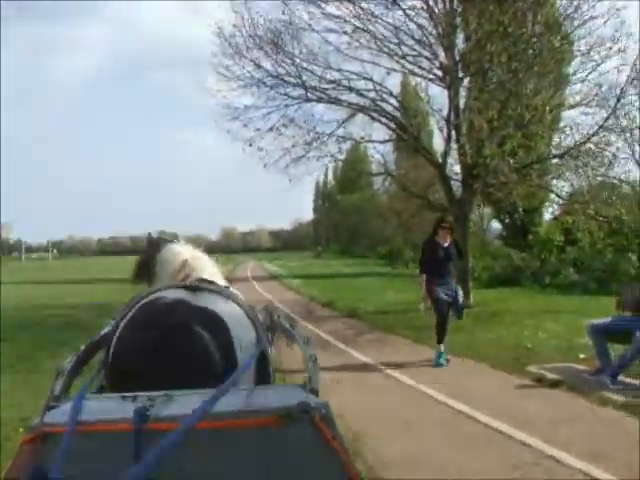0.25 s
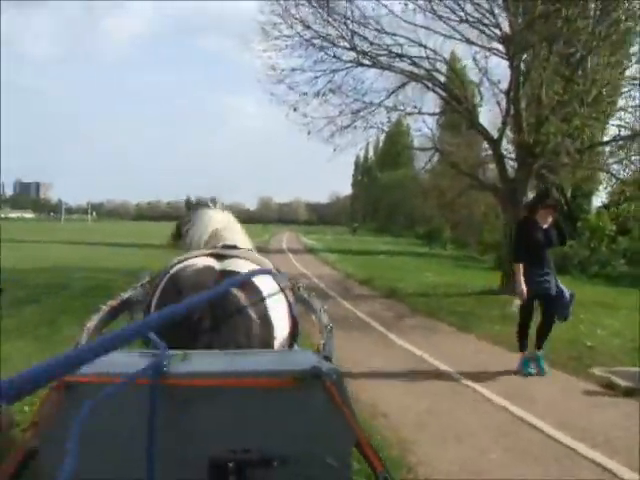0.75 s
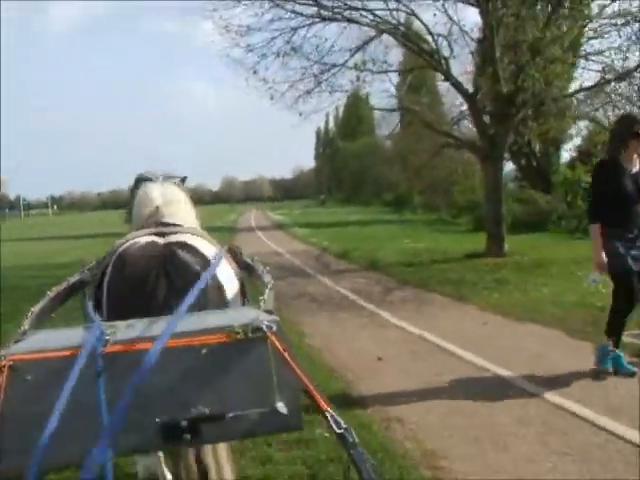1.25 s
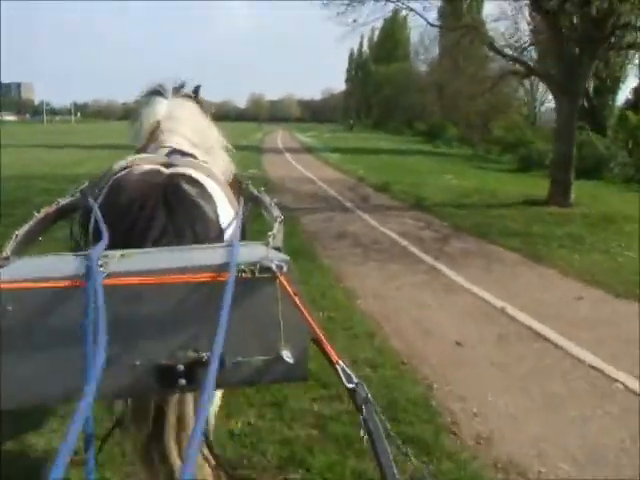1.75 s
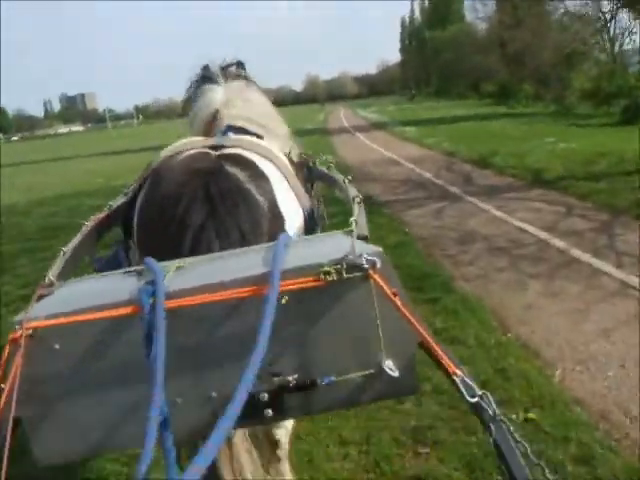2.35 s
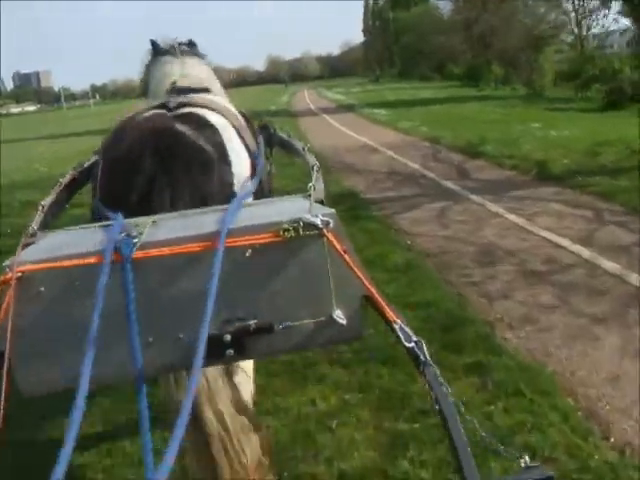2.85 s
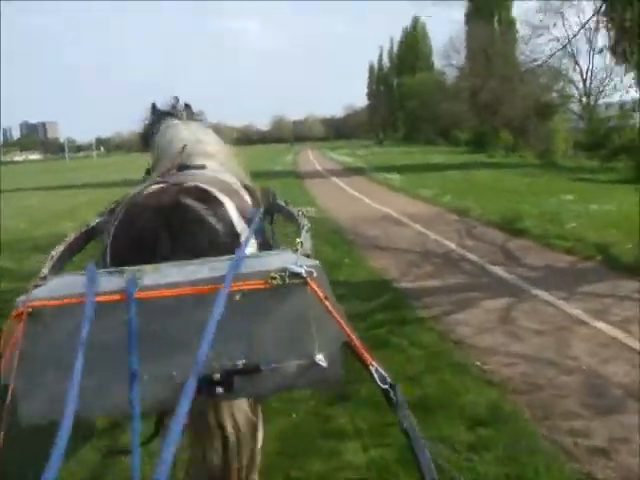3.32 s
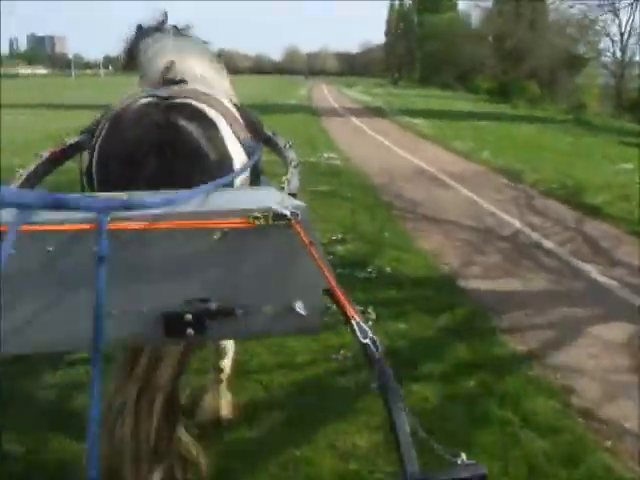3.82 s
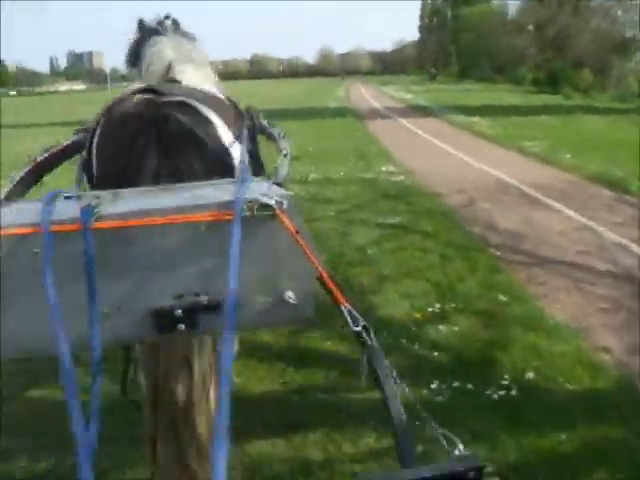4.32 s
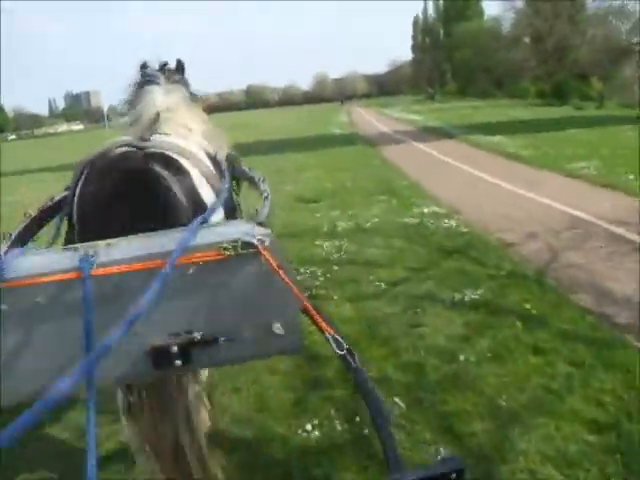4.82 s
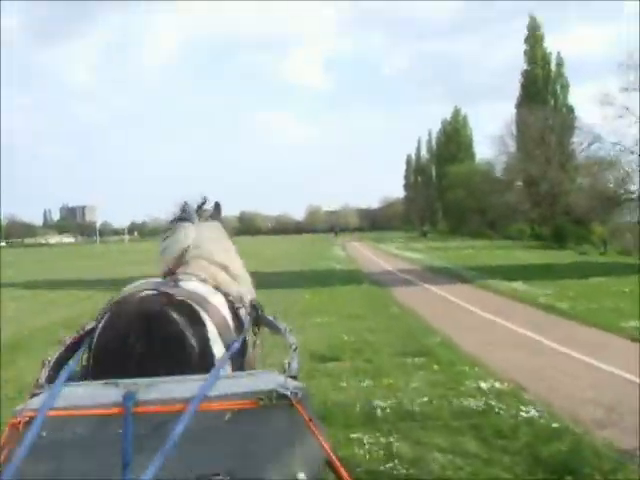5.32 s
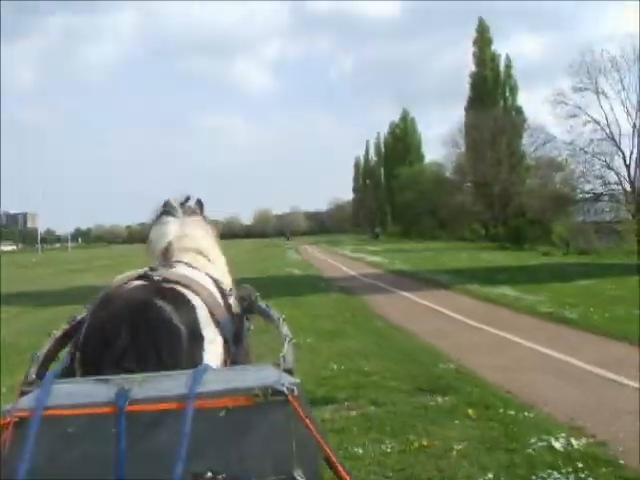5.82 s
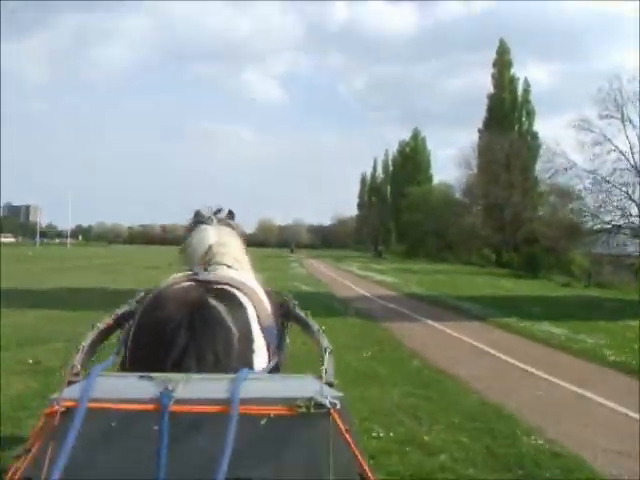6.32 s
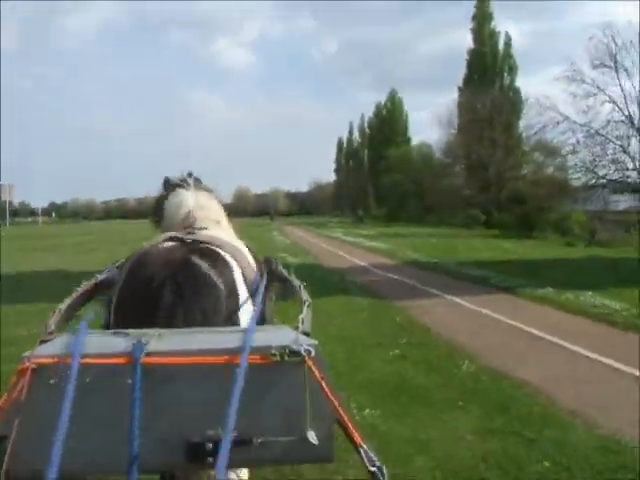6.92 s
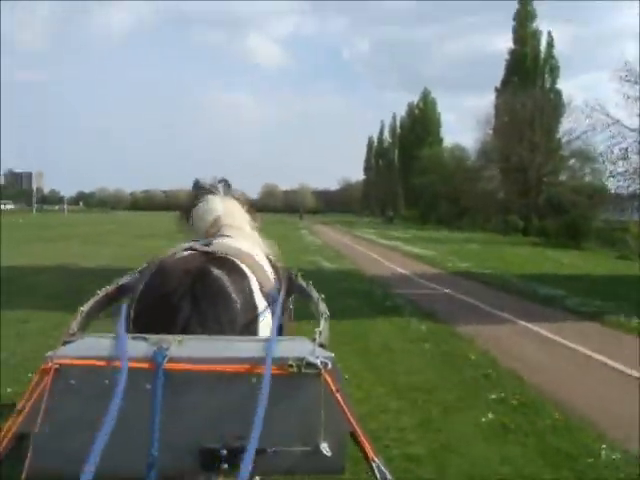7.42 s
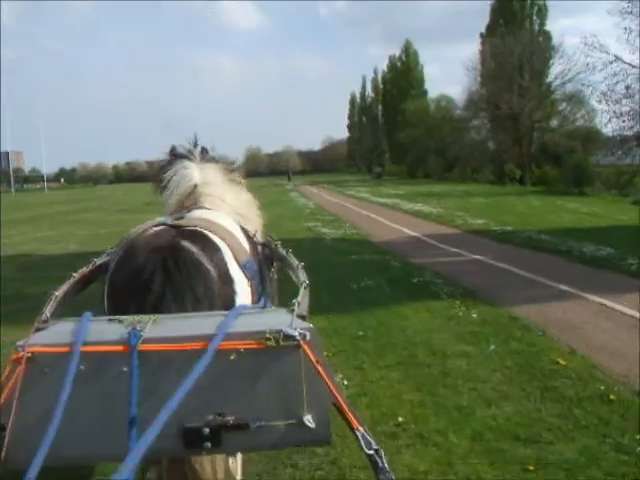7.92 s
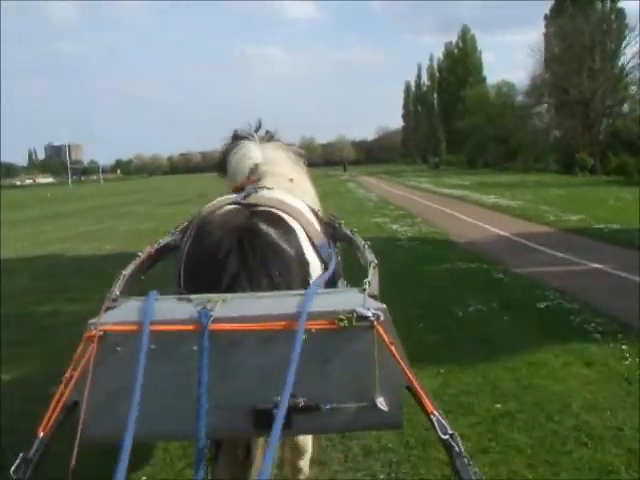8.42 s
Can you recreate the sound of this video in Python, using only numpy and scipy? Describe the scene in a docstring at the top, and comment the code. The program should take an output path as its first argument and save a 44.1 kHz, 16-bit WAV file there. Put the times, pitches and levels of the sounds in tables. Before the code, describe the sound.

A light pony cart rattles and clatters over grass, with hollow thumps, rumbling wheels and four short lip squeaks from the driver.

```python
"""Loose metal fittings clatter at every jolt of a light pony cart on grass, heard from the driver's seat.
Impacts excite the modes of the fittings, the frame and a loose bar; the hollow footboard box resonates,
droning and thumping. The reins swish once, and four times the driver urges the pony on with a squeak of
pursed lips, a fast train of pulses. Wheels and wind rumble as low bands of noise over a faint far hum."""
import sys
import numpy as np
from scipy import signal
from scipy.io import wavfile
from scipy.ndimage import uniform_filter1d

SR = 44100
rng = np.random.default_rng(int(sys.argv[2]) if len(sys.argv) > 2 else 0)


def file_out(sig):
    """Save sig as 16-bit WAV at sys.argv[1]."""
    # one column per channel
    cols = np.atleast_2d(sig).T
    # limit, then scale
    lim = np.clip(cols, -1, 1)
    pcm = np.round(lim * 32767).astype(np.int16)
    wavfile.write(sys.argv[1], SR, pcm)


N = 381906

# Jolts of the cart: (time [s], level [dB], brightest pitch [Hz], relative knock [dB], relative snap [dB])
JOLT_EVENTS = [(0.153, -24.5, 7450, -3, 5), (0.632, -17, 3740, -12, -2), (0.648, -28, 7300, -14, 12),
               (0.775, -15.5, 7100, -2, 1), (0.843, -6.5, 5410, -11, -3), (0.9353, -22.5, 5400, -3, 10),
               (1.1505, -27, 3280, 4, 3), (1.308, -29, 3580, 1, 8), (1.334, -29, 5200, -2, 8),
               (1.368, -3, 3400, -1, 4.5), (1.5088, -26, 3600, -8, 13), (1.535, -39, 4300, -17, 10),
               (1.5546, -18.5, 4900, -7, -5), (1.7425, -42, 3100, 0, 10), (1.8494, -17, 6700, -12, -7),
               (1.8914, -17, 5550, -9.5, -15), (1.9914, -11.5, 6200, -15, -9), (2.026, -14, 4400, -5, -7),
               (2.134, -21.5, 6700, -3, 0), (2.373, -1.5, 2600, -10, -11), (2.4134, -11.5, 4600, -19, -15),
               (2.451, -13, 4140, 4, 0), (2.486, 1, 2800, -11, -11), (2.5272, -13, 5600, -14, -9),
               (2.7459, -5, 3140, -3, -7.5), (2.768, 8, 3670, -19, -11), (2.818, -5, 6300, -20, -13),
               (2.889, -17.5, 3450, -3, -2), (3.053, -12, 3140, -6.5, -12), (3.098, 3, 6900, -18, -12),
               (3.1894, -20, 5140, -15, -5), (3.323, -15, 3020, -13, -4), (3.3482, -11, 5070, -7.5, -6),
               (3.3944, -11, 4030, -12, -13), (3.418, -6, 7080, -16, -12), (3.481, 0, 3130, -0.5, -8),
               (3.577, 1, 4900, -4, -7), (3.7409, -16.5, 4980, -32, 6), (3.797, -12, 5500, -27, -10),
               (3.932, -15, 5170, -6, 1), (3.992, -20, 4870, -11, 2), (4.024, -15.5, 5230, -18, 6),
               (4.042, -7.5, 6240, -7, -4), (4.136, -12.5, 7600, -17, -5), (4.1717, -13, 5670, -16, -1),
               (4.2776, -13.5, 5800, -36, -14), (4.315, 3, 7070, -32, -25.5), (4.367, -11, 5930, -17, -4),
               (4.406, -22, 3950, -5, -6), (4.4607, -15.5, 5530, -27, -3), (4.526, -21.5, 7450, -13, 3),
               (4.63, -8.5, 6200, -18, -8), (4.767, -12.5, 5270, -18, -9), (4.83, -13, 5400, -9, -2),
               (4.879, -9.5, 5100, -23, -2), (5.0792, -25.5, 4870, -24, 14), (5.206, -10, 3700, -21, -16),
               (5.297, -6.5, 4700, -8.5, -5.5), (5.3976, -25, 6850, -11, -6), (5.468, -24, 6600, -7.5, 3),
               (5.498, -22.5, 5160, -11, -12), (5.5433, -10.5, 5100, -5, 1), (5.5944, -14, 6900, -8, 0),
               (5.627, -19, 5300, -6.5, 1), (5.754, -20, 6900, -4, -6), (5.859, -26.5, 7400, -18, 1),
               (5.893, -5, 5100, -12, -17), (5.952, -9.5, 3950, -11, -8), (6.068, -20, 6100, -17, -12),
               (6.137, -15, 6600, -14, -4), (6.2205, -12, 5150, -12, -10), (6.3061, -25, 3200, -15, 3),
               (6.3664, -15, 5700, -7, 11), (6.46, -12, 3460, -5.5, -8), (6.49, -12, 6400, -1, 0),
               (6.5825, -13.5, 4900, -4, -4), (6.674, -4.5, 5300, -12, -10), (6.711, -10.5, 3170, -14, -12),
               (6.773, -13, 5300, -10, -9), (6.851, -18, 6750, -6, 1), (6.9345, -12, 6540, -12, 9.5),
               (6.947, -12, 6600, -8, -2), (6.982, -9, 7150, -2, -4), (7.045, -6, 5400, -7, -12),
               (7.121, -11, 5400, -8, -20), (7.1458, 1, 3500, -11, 6), (7.273, -5, 5140, -15, -4),
               (7.5137, -13.5, 6260, -27, -7), (7.6004, -8, 7100, -12.5, -8), (7.668, -21, 3700, -20, -12),
               (7.728, -17, 2800, -6, -8), (7.7612, -9, 7000, -13, -2), (7.8214, -6, 4930, -10, -7),
               (8.068, -24, 6800, -3, 4), (8.1236, -21.5, 5000, -5.5, -12), (8.191, -14, 7500, -8, -4),
               (8.305, -17.5, 7140, -5.5, -2), (8.336, -17, 5270, -9, -11), (8.3825, -12, 3040, -4.5, 0),
               (8.481, -25, 6230, -15, 5)]
# Modes of the metal fittings: (frequency [Hz], T60 [s])
FITTING_MODES = [(2370, .022), (2750, .022), (3170, .028), (3550, .036), (3850, .028), (4300, .022),
                 (4700, .026), (5100, .032), (5420, .034), (5800, .024), (6200, .024), (6650, .022),
                 (7070, .04), (7500, .022)]
# Modes of the frame: (frequency [Hz], level [dB], T60 [s])
FRAME_MODES = [(730, 0, 0.03), (969, 1, 0.035), (1220, -2, 0.03), (1580, -3, 0.022), (2043, 6, 0.02)]
# Thumps on the footboard box: (time [s], push level [dB], chassis thud level [dB])
THUMP_EVENTS = [(0.777, -8, -17), (1.155, -34, -36), (1.273, -12, -48), (1.371, -4, -43), (1.558, -16, -28),
                (1.743, -21, -33), (1.993, -10, -31), (2.452, -7, -33), (2.493, 1.5, -28), (2.743, -6, -36),
                (2.892, -2, -36), (3.05, -3, -36), (3.116, -18, -14.5), (3.483, 2, -18), (3.579, 6.5, -33),
                (3.599, 2.5, -40), (4.063, 0, -5), (4.479, -13, -22), (4.804, -1.5, -24), (4.905, -3, -18),
                (5.051, -11.5, -28), (5.545, -20, -36), (5.897, -10, -33), (6.464, -14, -40),
                (6.527, -20, -35), (6.786, -1, -36), (6.98, -27, -26), (7.057, 8, -23), (7.12, -25, -16),
                (7.612, -11, -27), (7.91, -6, -39), (8.45, -22, -14.5), (8.513, -5, -6)]
# Resonances of the box: (frequency [Hz], bandwidth [Hz], gain [dB])
BOX_MODES = [(250.6, 41, -8), (346, 38.4, -4.5), (402, 41.5, 0.5), (467, 86, -6), (568, 61, -9),
             (748, 177, -22)]
# Touches on the loose bar: (time [s], level [dB])
CLANK_EVENTS = [(2.7694, -27), (4.4054, -27), (5.2987, -23.5), (5.5442, -27), (5.9, -23), (6.224, -28),
                (6.464, -19), (6.5252, -18), (7.2774, -31), (7.4272, -33), (8.1938, -29)]
# Modes of the bar: (frequency [Hz], level [dB], T60 [s])
BAR_MODES = [(1448, 1, 0.077), (1532, 0.5, 0.13)]
# Lip squeaks, one contour each: (time [s], flap rate [Hz], level [dB], brightness [Hz])
SQUEAK_CONTOURS = [
    [(0.668, 844, -12, 8000), (0.672, 1047, -20, 7000), (0.677, 1310, -11, 4000), (0.69, 984, -7, 4000),
     (0.705, 748, -7.5, 2920), (0.713, 522, -23, 1230), (0.734, 246, -21, 400)],
    [(1.603, 1096, -29, 5030), (1.61, 1057, -15.5, 3960), (1.62, 930, -6.5, 3750), (1.635, 685, -7.5, 2980),
     (1.646, 517, -13.5, 1310), (1.652, 380, -18, 605), (1.669, 219, -19, 300)],
    [(3.634, 795, -18, 5030), (3.646, 1134, -17, 4970), (3.652, 1107, -12.5, 5060),
     (3.664, 994, -13.5, 4970), (3.668, 904, -10.5, 4100), (3.684, 604, -14.5, 3060),
     (3.692, 473, -20, 1000)],
    [(7.712, 1654, -16, 7000), (7.717, 1472, -14.5, 7000), (7.728, 1535, -8, 6860), (7.733, 1320, -9, 6900),
     (7.737, 1457, -8, 4000), (7.748, 1050, -15, 2220), (7.759, 570, -21, 1200)],
]
# Steady levels of the ride: (time [s], box drone [dB], wheels [dB], fine clatter [dB], wind [dB])
RIDE_LEVELS = [(0.0, -39.5, -35.5, -41.5, -66), (1.08, -37.5, -34.5, -39.5, -59),
               (1.44, -32, -37.5, -38, -52), (1.78, -29, -32.5, -36.5, -37), (2.14, -29.5, -33, -36, -30),
               (2.77, -22, -28, -31, -59), (3.18, -27, -27.5, -37.5, -39), (3.5, -24, -21, -33, -39),
               (3.74, -28.5, -28, -32.5, -35), (4.58, -28.5, -31, -34.5, -33),
               (5.55, -28.5, -30.5, -39.5, -42), (6.25, -28.5, -32.5, -38, -39.5),
               (6.751, -20.5, -28.5, -34, -32), (7.14, -22.5, -28.5, -34.5, -44),
               (7.35, -24, -22.5, -33.5, -23.5), (7.62, -23.5, -30, -31, -27.5),
               (8.05, -26, -40, -40.5, -35), (8.66, -24.5, -27, -33.5, -27)]
# Lurches over bumps: (peak time [s], box drone [dB], wheels [dB], fine clatter [dB])
LURCH_SWELLS = [(1.39, -24.5, -57, -38), (2.037, -22.5, -29, -31), (2.489, -14, -41, -22.5),
                (2.78, -27, -28, -26.5), (3.116, -25, -16.5, -22), (3.513, -15, -38, -21.5),
                (3.608, -19, -22, -19.5), (4.083, -40, -16.5, -31), (4.894, -20, -23, -24.5),
                (5.911, -24.5, -28, -36), (6.48, -26, -25, -30), (7.098, -16, -44, -25),
                (7.19, -23, -18.5, -31.5), (7.421, -21, -35, -35), (7.659, -20.5, -27, -38),
                (7.919, -33, -26, -39), (8.27, -29, -23, -38), (8.5, -46, -21.5, -55)]
# Buffets of wind on the microphone: (peak time [s], level [dB])
WIND_BUFFETS = [(2.51, -26), (2.99, -25), (3.251, -26), (4.0, -24.5), (4.768, -19), (5.27, -23.5),
                (6.55, -28), (7.2, -25), (7.43, -16.5), (7.7, -28), (7.93, -19.5), (8.4, -22.5)]
# Spectrum of the fine clatter: (frequency [Hz], relative density [dB])
CLATTER_SPECTRUM = [(290, -40.5), (500, -16), (660, -4.5), (1060, -8), (2120, -10.5), (2300, -10.5),
                    (3210, -14.5), (7290, -13), (7900, -19.5), (10300, -62.5), (17400, -120)]
# Spectrum of the wheel rumble: (frequency [Hz], relative density [dB])
RUMBLE_SPECTRUM = [(38, -16.5), (65, -14), (211, -12.5), (246, -13), (330, -10.5), (430, -37.5),
                   (730, -120)]
# Resonances of the far hum: (frequency [Hz], T60 [s], level [dB])
HUM_MODES = [(93.8, 0.51, -39), (214.6, 0.43, -43.5)]

JOLT_T60_S, MEAN_JOLT_DB, USUAL_SNAP_DB = 0.084, -17.5, -2.5   # the typical jolt
THUMP_T60_S, THUD_HZ, THUD_T60_S = 0.07, 139, 0.067


def jolts():
    """Impact excitation: each jolt snaps, scrapes the fittings into ringing and knocks the frame."""
    s, db, pitch, knock_db, snap_db = np.transpose(JOLT_EVENTS)
    slowness = from_db(-0.5 * (snap_db - USUAL_SNAP_DB))   # snappier jolts swell and die sooner
    t60 = slowness * JOLT_T60_S * from_db(-0.67 * (db - MEAN_JOLT_DB))   # harder jolts are briefer
    scatter = rng.standard_normal((len(s), len(FITTING_MODES) + len(FRAME_MODES)))
    grit = rms_one(rng.standard_normal(N) * from_db(3 * drift(230)))
    snap = band(np.sign(grit) * bursts(s, db + snap_db, t60=0.005, rise_s=0.00013), 1700, 6500)
    scrape = band(grit * bursts(s, db - 8.5, 1.16 * t60, rise_s=0.00053 * slowness ** 2), 2200, 8000)
    knock = band(grit * bursts(s, db + knock_db + 8.5, 1.45 * t60, rise_s=0.0057), 530, 1700)
    fittings, frame = np.zeros((2, N))
    for k, (hz, ring_s) in enumerate(FITTING_MODES):
        off_pitch_db = np.minimum(40 * abs(np.log2(hz / pitch)), 11)
        force = bursts(s, db - off_pitch_db + 3 * scatter[:, k], .8 * t60, rise_s=.0015 * slowness ** 2)
        fittings += ring(np.roll(grit, 999 * k) * force, hz, ring_s)
    for k, (hz, mode_db, ring_s) in enumerate(FRAME_MODES):
        force = bursts(s, db + knock_db + mode_db + 5 * scatter[:, -1 - k], .6 * t60, rise_s=.002)
        frame += ring(np.roll(grit, 777 * k) * force, hz, ring_s)
    blow = snap + scrape + knock + from_db(-25.5) * fittings + from_db(-31) * frame
    bounce_s = .011 * from_db(2.5 * drift(6.5))   # loose parts bounce once, after an uneven delay
    return blow + from_db(-12) * np.interp(np.arange(N) - SR * bounce_s, np.arange(N), blow)


def thumps():
    """Transient response: a firm push with a rough tail rings the box, and the chassis thuds."""
    s, push_db, thud_db = np.transpose(THUMP_EVENTS)
    push = rng.standard_normal(N) * bursts(s, push_db + 15.5, THUMP_T60_S, rise_s=0.0016)
    push += bursts(s, push_db + 16, t60=0.0028, rise_s=0.0004)
    thud = rng.standard_normal(N) * bursts(s, thud_db - 19, THUMP_T60_S, rise_s=.004)
    thud += bursts(s, thud_db - 26, t60=0.0083, rise_s=0.00099)
    return box(push) + band(ring(thud, THUD_HZ, THUD_T60_S), 76, 600)


def box(drive):
    """Modal superposition: the broad resonances of the hollow box add with alternating signs."""
    out = 0
    for k, (hz, width_hz, db) in enumerate(BOX_MODES):
        r = np.exp(-np.pi * width_hz / SR)
        feedback = [1, -2 * r * np.cos(2 * np.pi * hz / SR), r * r]
        mode = signal.lfilter((1 - r * r) / 2 * np.array([1, 0, -1]), feedback, drive)
        out += (-1) ** k * from_db(db) * mode
    return out


def clanks():
    """Free vibration: a short hard touch leaves the bar's two close modes ringing."""
    s, level_db = np.transpose(CLANK_EVENTS)
    touch = np.sign(rng.standard_normal(N)) * bursts(s, level_db - 14.5, t60=0.016, rise_s=0.0011)
    return sum(from_db(db) * ring(touch, hz, t60) for hz, db, t60 in BAR_MODES)


def lip_squeaks():
    """Valve oscillation: lips chop indrawn, hissing air into pulses that slow and dull as they slacken."""
    out = np.zeros(N)
    harmonic = np.arange(1, 16)[:, None]
    for contour in SQUEAK_CONTOURS:
        s, *columns = np.transpose(contour)
        at = np.arange(round(s[0] * SR), round(s[-1] * SR))
        flap_hz, level_db, bright_hz = [np.interp(at / SR, s, c) for c in columns]
        wobble = 1 + .04 * rms_one(uniform_filter1d(rng.standard_normal(len(at)), size=60))
        phase = 2 * np.pi * np.cumsum(flap_hz * wobble) / SR
        hz = harmonic * flap_hz
        weights = harmonic ** 0.36 / (1 + (hz / (0.81 * bright_hz)) ** 4.1)
        weights += 0.34 * bright_hz / 5000 / (1 + ((hz - 7100) / 700) ** 2)   # cavity behind the lips
        pulses = -np.sum(weights * np.cos(harmonic * phase - 0.33 * hz / bright_hz), axis=0)
        pulses /= np.sqrt(np.sum(weights ** 2, axis=0) / 2)
        hiss = (0.33 + 0.037 * bright_hz / 5000) * band(rng.standard_normal(len(at)), 2500, 9000)
        fade = np.minimum(1, np.minimum(at - at[0], at[-1] - at) / (0.00079 * SR))
        out[at] += from_db(level_db) * fade * (pulses + hiss)
    return out


def rein_swish():
    """Flow noise: reins flicked through the air give a bright hiss that swells and fades."""
    power = swells(np.array([0.453]), np.array([-30.5]), rise_s=0.034, fall_s=0.23)
    hiss = band(rng.standard_normal(N), 4900, 20000) + 0.81 * band(rng.standard_normal(N), 1200, 3000)
    return np.sqrt(power + 1e-12) * rms_one(hiss)


def box_drone(level_db):
    """Forced vibration: random shaking keeps the resonances of the box sounding."""
    return from_db(level_db + drift(6)) * rms_one(box(rng.standard_normal(N)))


def fine_clatter(level_db):
    """Shot noise: countless small touches clump over a hiss of tyres in grass, with lone ticks on top."""
    sizes = from_db(1.7 * np.minimum(rng.exponential(1, (2, N)), 5)) * rng.choice([-1, 1], (2, N))
    touches = sizes * (rng.random((2, N)) < 2500 * from_db(5 * drift(25)) / SR)
    tyre_hiss = from_db(-3) * rng.standard_normal((2, N))
    gain = from_db(level_db + 1.5 * drift(14))
    clatter = shaped_noise(rms_one(touches) + tyre_hiss, CLATTER_SPECTRUM, flicker_db=1.5, rate_hz=12)
    tick_db = -4 + np.minimum(level_db + 36, 0)   # below -36 dB, ticks fade faster than the clatter
    return gain * (clatter + from_db(tick_db) * ticks(per_s=100))


def ticks(per_s):
    """Poisson impacts: chain links and buckles each give a dry crack and briefly ring one fitting."""
    sizes = from_db(3 * np.minimum(rng.exponential(1, N), 4)) * (rng.random(N) < per_s / SR)
    struck = rng.integers(0, len(FITTING_MODES), N)
    rings = sum(ring(sizes * (struck == k), hz, 0.56 * t60) for k, (hz, t60) in enumerate(FITTING_MODES))
    decay = signal.lfilter([1], [1, -from_db(-60 / (.025 * SR))], sizes + 1e-18)
    crack = band(decay * rng.standard_normal(N), 2200, 9000)
    return rms_one(rms_one(rings) + 1.2 * rms_one(crack))


def wheel_rumble(level_db):
    """Rolling noise: the wheels give low bands that flicker independently."""
    noise = rng.standard_normal((2, N))
    return from_db(level_db) * shaped_noise(noise, RUMBLE_SPECTRUM, flicker_db=4, rate_hz=10.6)


def wind(level_db):
    """Turbulence: pressure fluctuations on the microphone make a very low rumble."""
    return from_db(level_db) * rms_one(band(rng.standard_normal(N), 2.6, 87))


def far_hum():
    """Narrow-band noise: two sharp resonances give a faint low hum."""
    return sum(from_db(db) * rms_one(ring(rng.standard_normal(N), hz, t60)) for hz, t60, db in HUM_MODES)


def from_db(db):
    """Amplitude ratio of a level in decibels."""
    return 10 ** (np.asarray(db) / 20)


def rms_one(x):
    """Normalisation to unit rms."""
    return x / np.sqrt(np.mean(x ** 2) + 1e-20)


def drift(rate_hz):
    """Slow random modulation: noise through a double one-pole low-pass, unit rms."""
    r = np.exp(-80 * np.pi * rate_hz / SR)   # one step per 40 samples
    slow = signal.lfilter([1], [1, -2 * r, r * r], rng.standard_normal(N // 40 + 2002))[2000:]
    return np.interp(np.arange(N) / 40, np.arange(len(slow)), rms_one(slow))


def ring(x, hz, t60):
    """Damped oscillator: a unit impulse starts a decaying sine of height 1."""
    r, w = from_db(-60 / (t60 * SR)), 2 * np.pi * hz / SR
    return signal.lfilter([0, np.sin(w)], [1, -2 * r * np.cos(w), r * r], x + 1e-18)


def band(x, low_hz, high_hz):
    """Band-pass filtering."""
    return signal.sosfilt(signal.butter(2, [low_hz, high_hz], "band", fs=SR, output="sos"), x)


def shaped_noise(sources, spectrum, flicker_db, rate_hz):
    """Spectral shaping: flickering half-octave bands, drawn from two sources in turn; unit rms."""
    hz, db = np.transpose(spectrum)
    edges = hz[0] * 2 ** np.arange(0, np.log2(hz[-1] / hz[0]) + .5, .5)
    out = 0
    for k, (low, high) in enumerate(zip(edges, edges[1:])):
        level_db = np.interp(np.log(low * high) / 2, np.log(hz), db)
        out += from_db(level_db + flicker_db * drift(rate_hz)) * band(sources[k % 2], low, high)
    return rms_one(out)


def bursts(s, levels_db, t60, rise_s):
    """Impact envelope: a quick rise and an exponential decay at each given time."""
    t = np.arange(4500) / SR
    shape = np.full(N + len(t), 1e-18)
    for at, db, fall, rise in np.broadcast(np.round(s * SR).astype(int), levels_db, t60, rise_s):
        shape[at:at + len(t)] += from_db(db - 60 * t / fall) * (1 - np.exp(-t / rise))
    return shape[:N]


def swells(s, levels_db, rise_s, fall_s):
    """Incoherent addition: the summed power of bell-shaped swells around the given times."""
    grid = np.arange(0, N, 64)
    t = grid / SR - s[:, None]
    bells = np.exp(-(t / np.where(t < 0, rise_s, fall_s)) ** 2)
    power = np.sum(from_db(2 * levels_db)[:, None] * bells, axis=0)
    return np.interp(np.arange(N), grid, power)


def scene():
    """Superposition at one open-air microphone; lurches and buffets add power to the steady ride."""
    s, *ride_db = np.transpose(RIDE_LEVELS)
    steady = [from_db(2 * np.interp(np.arange(N) / SR, s, db)) for db in ride_db]
    lurch_s, *lurch_db = np.transpose(LURCH_SWELLS)
    surges = [swells(lurch_s, db, rise_s=0.028, fall_s=0.049) for db in lurch_db]
    surges.append(swells(*np.transpose(WIND_BUFFETS), rise_s=0.037, fall_s=0.037))
    drone_db, rumble_db, clatter_db, wind_db = 10 * np.log10(np.add(steady, surges))
    background = box_drone(drone_db) + wheel_rumble(rumble_db) + wind(wind_db) + far_hum()
    cart = jolts() + thumps() + clanks() + rein_swish() + fine_clatter(clatter_db)
    return (cart + lip_squeaks() + background)[None]


def record(dry):
    """Compression: the gain ducks after loud moments and recovers; peaks are rounded, the top is cut."""
    level_db = 10 * np.log10(uniform_filter1d(dry[0] ** 2, size=400) + 1e-9)
    release_db = 43 * np.arange(N) / SR   # the held level falls 43 dB per second
    held_db = np.maximum.accumulate(level_db + release_db) - release_db
    duck_db = signal.lfilter([.004], [1, -.996], .3 * np.maximum(held_db + 24, 0))
    rounded = 1.428 * np.tanh(dry * from_db(-duck_db) / 1.379)
    return signal.sosfilt(signal.cheby2(16, 75, 8850, fs=SR, output="sos"), rounded)


dry = scene()
out = record(dry)
file_out(out)
```